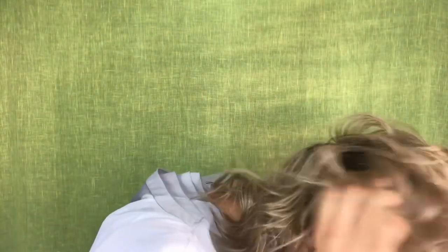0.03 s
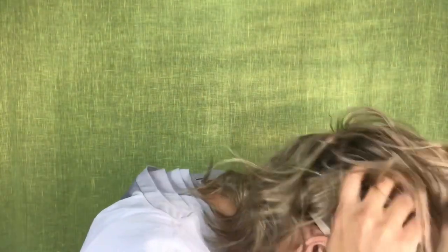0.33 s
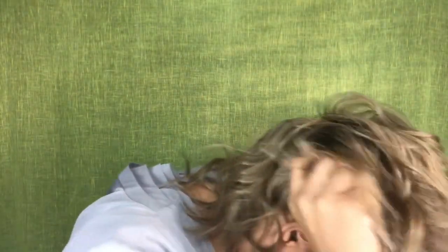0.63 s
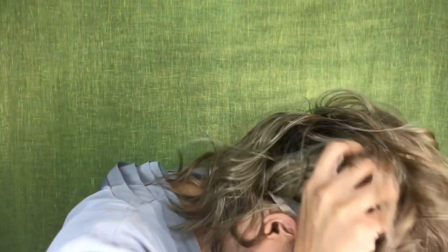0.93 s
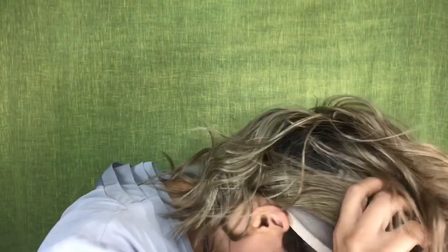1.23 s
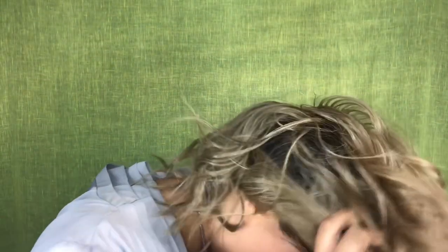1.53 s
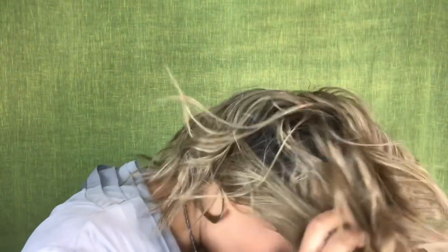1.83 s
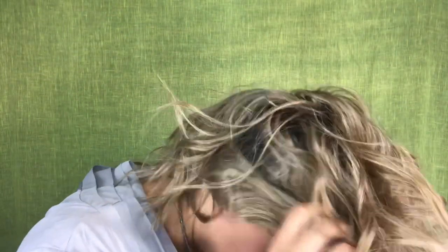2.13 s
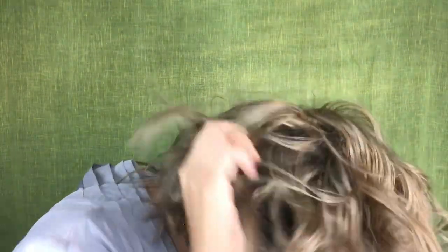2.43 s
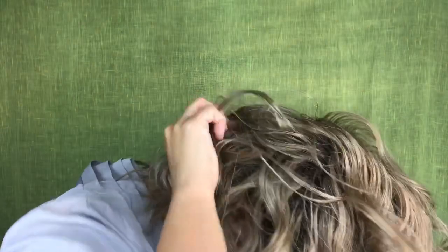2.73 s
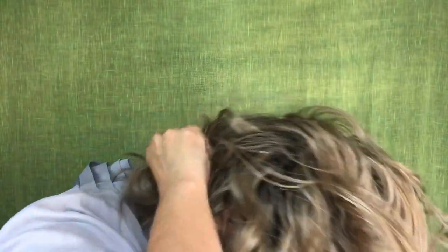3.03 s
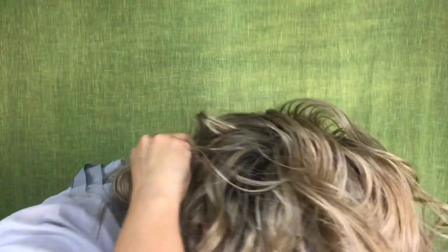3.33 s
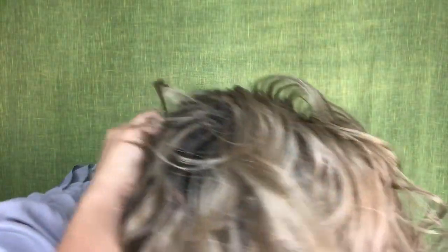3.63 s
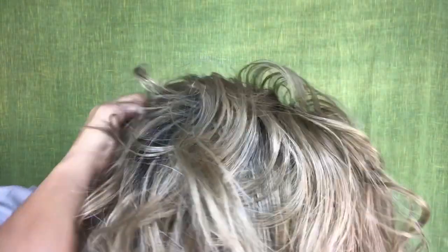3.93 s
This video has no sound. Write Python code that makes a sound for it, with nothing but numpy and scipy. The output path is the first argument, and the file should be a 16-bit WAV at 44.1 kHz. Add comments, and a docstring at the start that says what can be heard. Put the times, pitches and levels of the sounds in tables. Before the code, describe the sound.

Hair rustles softly close to the microphone as hands adjust a wig in a quiet room. Hissing strokes and short brushes grow slightly firmer, ending with tiny ticks and one louder brush, over steady ventilation rumble.

```python
"""A quiet room, close to the microphone: hands pull a wig into place over steady ventilation.
From the start, fingers slide through the hair in soft hissing strokes and short brushes.
The strokes grow a little firmer toward the middle, and near three seconds fingertips scuff the cap.
Single strands snap free, sparsely at first, then in a cluster around the last and loudest brush.
The rumble and faint hum of the ventilation lie behind it all, to the end."""
import sys
import numpy as np
from scipy import signal
from scipy.fft import rfft, irfft
from scipy.io import wavfile
from scipy.ndimage import uniform_filter1d

SR = 44100
rng = np.random.default_rng(int(sys.argv[2]) if len(sys.argv) > 2 else 0)


def store_wav(level_fs):
    """Save 16-bit WAV to argv[1]."""
    pcm = np.round(np.clip(np.atleast_2d(level_fs), -1, 1) * 32767)
    wavfile.write(sys.argv[1], SR, pcm.T.astype(np.int16))


N = 176400

# Slow strokes through the hair. Each row: start in seconds, length in seconds, level in dB.
HAIR_STROKES = [(0.027, 0.17, -75.5), (0.324, 0.13, -77), (.49, 0.2, -74.5), (.72, 0.12, -86),
                (0.918, 0.37, -76.5), (1.362, 0.14, -74.5), (1.448, 0.22, -71), (1.61, 0.19, -70.5),
                (1.848, 0.13, -72), (2.118, 0.2, -75.5), (2.235, 0.2, -73), (2.35, 0.35, -71.5),
                (2.64, 0.287, -69), (2.888, 0.21, -73), (3.015, 0.26, -71), (3.25, 0.17, -75.5),
                (3.39, 0.16, -74), (3.643, 0.29, -75.5), (3.924, .14, -69.5)]
# Quick brushes over a lock. Each row: peak in seconds, length in seconds, lock level in dB,
# level of the bright tips in dB.
LOCK_BRUSHES = [(.444, .025, -76, -73.5), (0.622, 0.027, -70.5, -71), (0.734, 0.054, -73, -75),
                (1.05, .08, -77, -78), (1.942, 0.058, -69, -74), (2.32, 0.091, -73, -74),
                (2.716, 0.062, -70, -78), (3.147, .12, -74, -72), (3.224, .03, -79, -76),
                (3.324, 0.046, -74, -74), (3.762, 0.06, -79, -79), (3.826, 0.071, -61.5, -66.5)]
# Strands snapping free. Each row: start in seconds, starting level in dB, pitch in Hz.
STRAND_SNAPS = [(0.441, -61, 7200), (.62, -66, 10000), (1.941, -63, 7000), (3.339, -63, 8000),
                (3.673, -59, 8000), (3.682, -64, 8300), (3.696, -66, 8800), (3.748, -66, 8000),
                (3.762, -67, 12500), (3.816, -60, 8400), (3.952, -62, 7500), (3.958, -59, 7600),
                (3.968, -66.5, 12900)]
# Fingertips on the wig's cap. Each row: peak in seconds, length in seconds, level in dB.
CAP_RUBS = [(.105, 0.065, -75), (2.72, 0.06, -70.5), (2.86, 0.069, -72), (3.13, .05, -78)]
# Spectra at the microphone of stroked hair, a brushed lock, its tips, the cap and the room's air.
# Each row: frequency in Hz, relative level in dB.
STROKE_SPECTRUM = [(300, -11), (1200, 4), (2500, -2.5), (4500, -3), (5900, -1.5), (6700, 1.5), (7800, -3.5),
                   (10500, -4.5), (13000, -4), (15500, -8)]
LOCK_SPECTRUM = [(300, -14), (1200, 9.5), (2500, 2.5), (4500, 3), (6800, 0), (10000, -2), (13000, -8),
                 (15500, -12)]
TIP_SPECTRUM = [(500, -34), (5000, -16), (8000, -2.5), (11000, -5), (14000, -4), (15500, -5)]
CAP_SPECTRUM = [(500, -31), (1500, -4), (2400, 4), (3500, -5), (6000, -27), (15000, -30)]
AIR_SPECTRUM = [(1, -2.5), (6, 3), (13, 0), (22, -5.5), (30, -9), (39, -8.5), (47, -8), (53, -12),
                (73, -12), (92, -21.5), (112, -25), (150, -27), (175, -25.5), (210, -30.5), (250, -27.5),
                (295, -29), (345, -36.5), (385, -37), (450, -42.5), (570, -41.5), (690, -46), (820, -41.5),
                (1050, -44.5), (1200, -47), (1450, -46), (1700, -50.5), (2200, -52), (2800, -55.5),
                (3200, -57.5), (5000, -60), (7000, -61.5), (11000, -63.5), (15500, -65.5)]
# Narrow bands of ventilation hum. Each row: centre in Hz, width in Hz, level in dB.
VENT_BANDS = [(101, 3.7, -64.5), (137.8, 5, -64), (232.5, 18, -74), (526.5, 29, -77.5), (626, 13, -80),
              (804, 31, -82), (957.4, 44, -75), (1326, 33, -87), (2870, 130, -86)]


def hair_strokes(rise_s=0.074, fall_s=0.052):
    """Hands slide slowly through the hair, close up; overlapping strokes add in power."""
    power = sum((amp(db) * swell(start, length, rise_s, fall_s)) ** 2
                for start, length, db in HAIR_STROKES)
    return np.sqrt(power) * friction(STROKE_SPECTRUM)


def lock_brushes(tip_lag_s=0.0065):
    """A finger passes quickly over a lock, and the tips flick past just after with a brighter hiss."""
    lock = sum(amp(db) * glance(peak, length) for peak, length, db, _ in LOCK_BRUSHES)
    tips = sum(amp(db) * glance(peak + tip_lag_s, length) for peak, length, _, db in LOCK_BRUSHES)
    return lock * friction(LOCK_SPECTRUM) + tips * friction(TIP_SPECTRUM)


def strand_snaps(decay_s=0.0013, width_hz=5600):
    """Caught strands let go by the microphone with a dry tick, each at its own pitch."""
    t = np.arange(N) / SR
    noise = rng.standard_normal(N)
    ticks = np.zeros(N)
    for start, db, hz in STRAND_SNAPS:
        decay = (t >= start) * np.exp(-abs(t - start) / decay_s)
        ticks += amp(db) * decay * band(noise, hz, width_hz)
    return ticks


def cap_rubs():
    """Fingertips scuff the cap beneath the hair."""
    touches = sum(amp(db) * glance(peak, length) for peak, length, db in CAP_RUBS)
    return touches * friction(CAP_SPECTRUM)


def friction(spectrum, slips_per_s=2500, slip_spread_db=2, slip_share=0.43, grip_db=0.3, grip_s=0.012):
    """Countless fibres slide as a hiss, with tiny separate slips, under uneven finger pressure."""
    slips = rng.standard_normal(N) * amp(slip_spread_db * np.minimum(rng.exponential(1, N), 4))
    slips *= rng.random(N) < slips_per_s / SR
    hiss = rng.standard_normal(N)
    fibres = np.sqrt(slip_share) * unit_rms(slips) + np.sqrt(1 - slip_share) * hiss
    pressure = amp(grip_db * wander(grip_s))
    return coloured(fibres * pressure, spectrum)


def ventilation(air_db=-38, throb_db=2, throb_s=0.07, rumble_below_hz=250):
    """The room tone: air rumble that throbs loosely, steady hiss and wavering bands of hum."""
    f = np.fft.rfftfreq(N, 1 / SR)
    air = amp(air_db) * coloured(rng.standard_normal(N), AIR_SPECTRUM)
    hum = sum(amp(db) * band(rng.standard_normal(N), hz, width) for hz, width, db in VENT_BANDS)
    rumble = irfft(rfft(air) / (1 + (f / rumble_below_hz) ** 4), N)
    hiss = air - rumble
    throb = unit_rms(amp(throb_db * wander(throb_s)))
    return rumble * throb + hiss + hum


def fan_motor(hum_hz=120.6, level_db=-60):
    """In the background, a fan motor hums faintly at twice the mains frequency."""
    cycles = hum_hz * np.arange(N) / SR + rng.random()
    return amp(level_db) * unit_rms(np.sin(2 * np.pi * cycles))


def swell(start, length, rise, fall):
    """A stroke's smooth attack, hold and release, all in seconds."""
    t = np.arange(N) / SR - start
    attack = np.sin(np.pi / 2 * np.clip(t / rise, 0, 1))
    release = np.sin(np.pi / 2 * np.clip((length - t) / fall, 0, 1))
    return attack * release


def glance(peak, length, rise=0.21, fall=0.27):
    """A passing touch swells to a peak and tapers away; rise and fall are shares of the length."""
    t = (np.arange(N) / SR - peak) / length
    return 2 * np.exp(-np.logaddexp(-t / rise, t / fall))


def wander(seconds):
    """Random drift, smoothed over the given time, at rms 1."""
    return unit_rms(uniform_filter1d(rng.standard_normal(N), int(seconds * SR), mode="wrap"))


def band(noise, centre_hz, width_hz):
    """One band of the noise, at rms 1."""
    f = np.fft.rfftfreq(N, 1 / SR)
    return unit_rms(irfft(rfft(noise) / (1 + (2 * (f - centre_hz) / width_hz) ** 2), N))


def coloured(noise, spectrum):
    """Gives the noise a spectrum drawn through the rows, at an rms near 1."""
    hz, db = np.transpose(spectrum)
    f = np.fft.rfftfreq(N, 1 / SR)
    gain = amp(np.interp(np.log(f + 1), np.log(hz + 1), db))
    return irfft(rfft(unit_rms(noise)) * unit_rms(gain), N)


def amp(db):
    """Decibels to gain."""
    return 10 ** (np.asarray(db) / 20)


def unit_rms(x):
    """Scales to rms 1."""
    return x / np.sqrt(np.mean(x ** 2) + 1e-20)


def scene():
    """One microphone, with the hair close by and the room behind."""
    return (ventilation() + hair_strokes() + lock_brushes() + cap_rubs()
            + strand_snaps() + fan_motor())[None]


def record(dry):
    """The recorder cuts off the highest treble."""
    cutoff_hz = 15760
    lowpass = signal.firwin(1023, cutoff_hz, window=("kaiser", 9), fs=SR)
    return signal.oaconvolve(dry, lowpass[None], "same")


dry = scene()
out = record(dry)
store_wav(out)
```